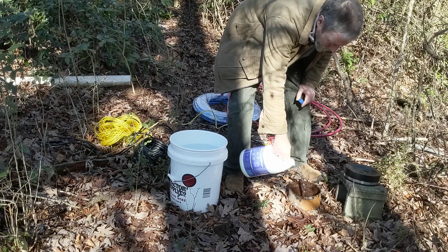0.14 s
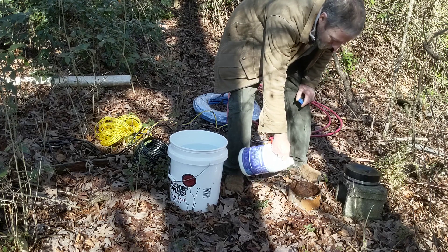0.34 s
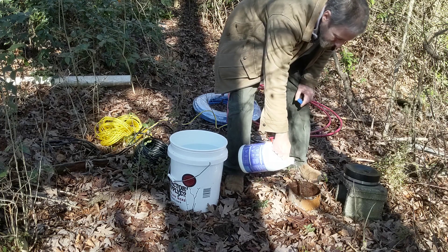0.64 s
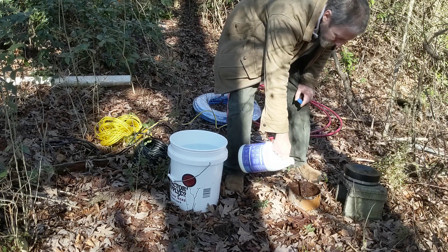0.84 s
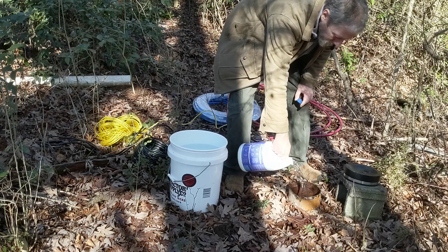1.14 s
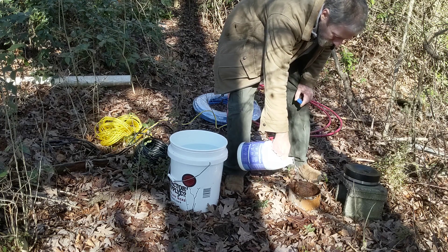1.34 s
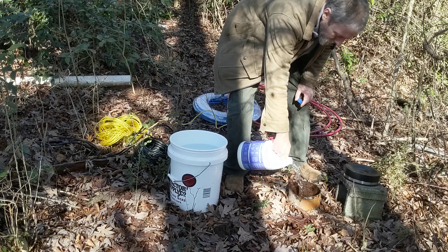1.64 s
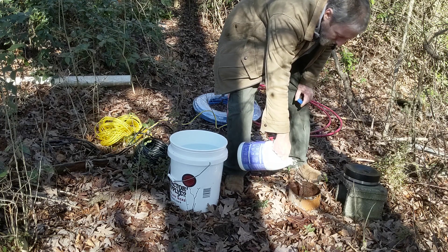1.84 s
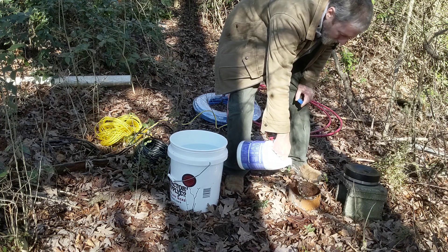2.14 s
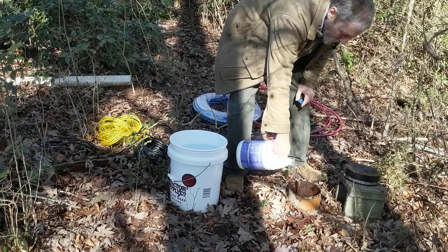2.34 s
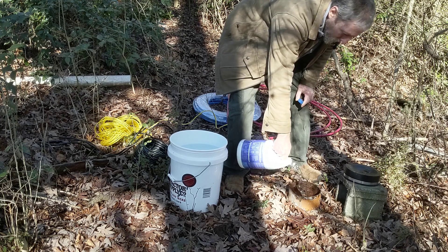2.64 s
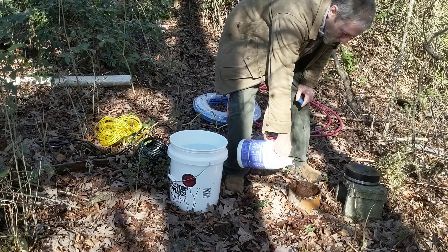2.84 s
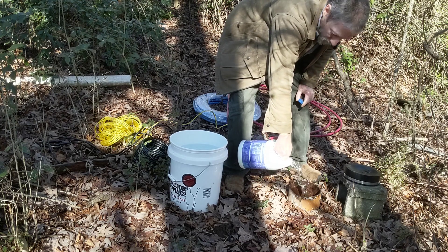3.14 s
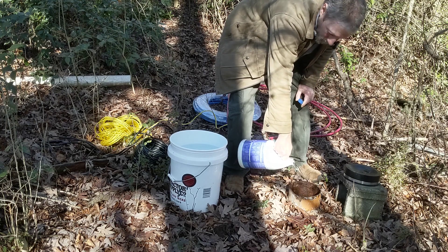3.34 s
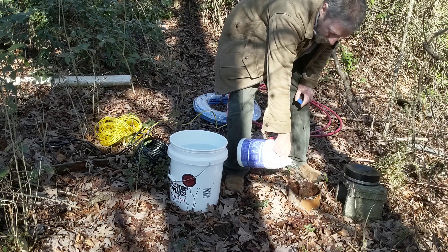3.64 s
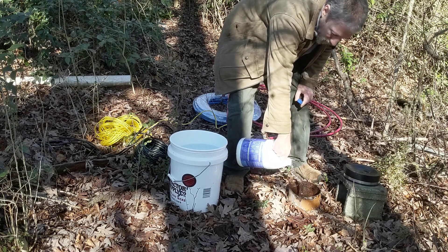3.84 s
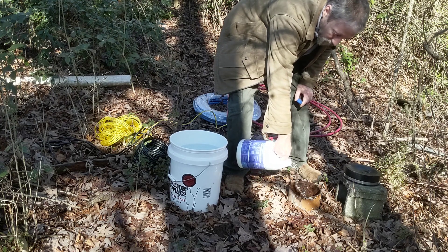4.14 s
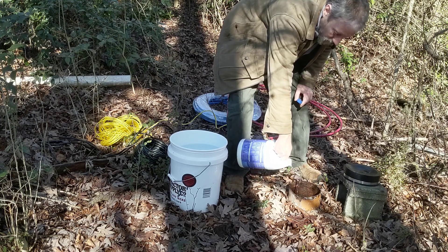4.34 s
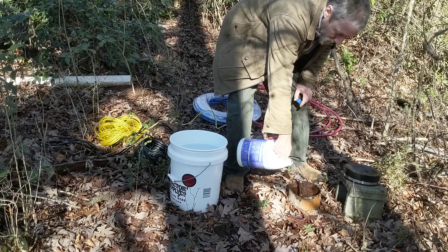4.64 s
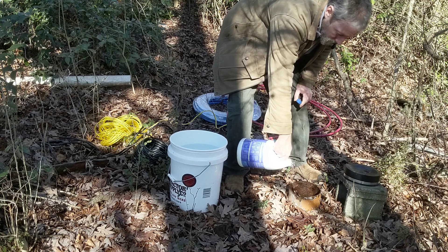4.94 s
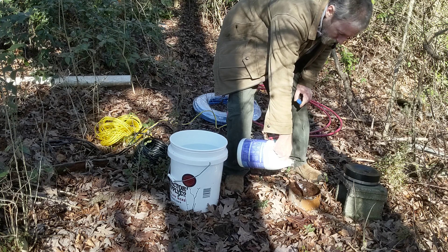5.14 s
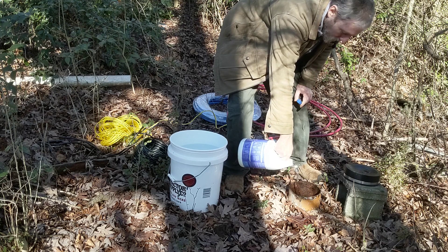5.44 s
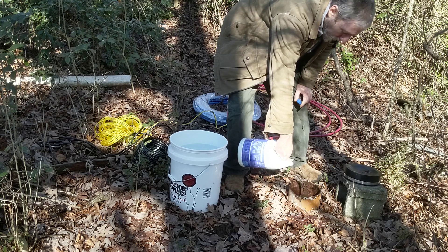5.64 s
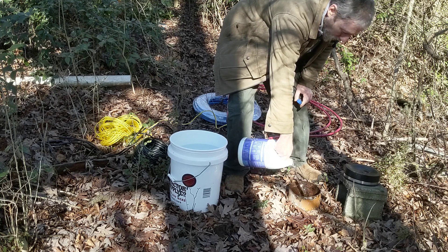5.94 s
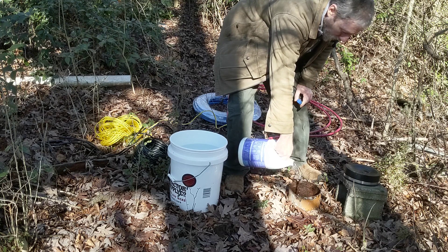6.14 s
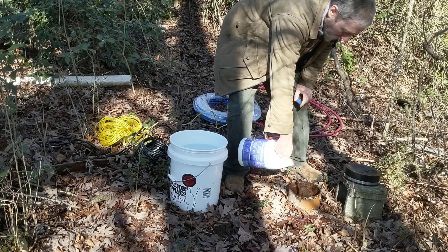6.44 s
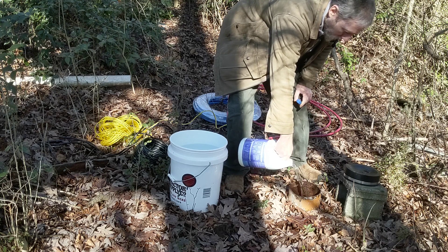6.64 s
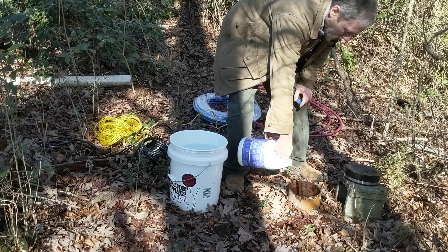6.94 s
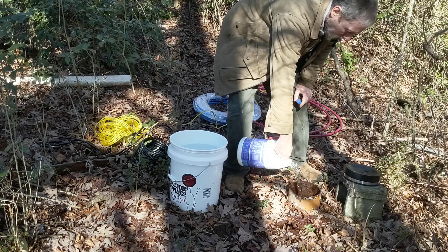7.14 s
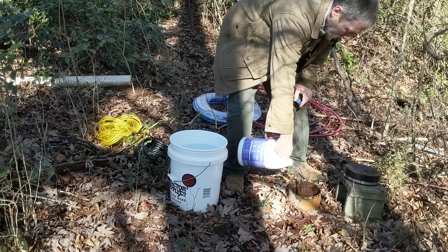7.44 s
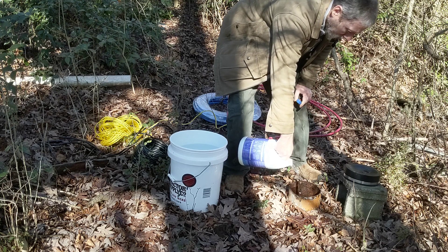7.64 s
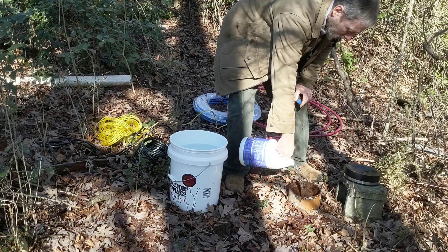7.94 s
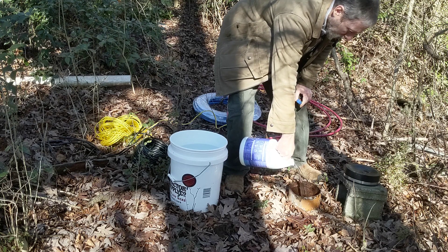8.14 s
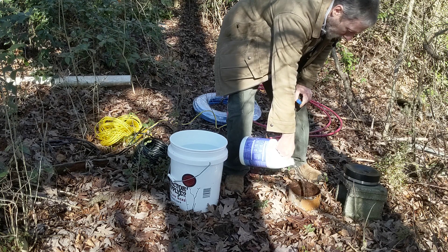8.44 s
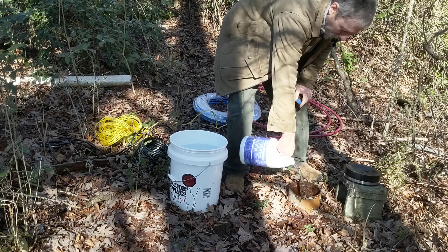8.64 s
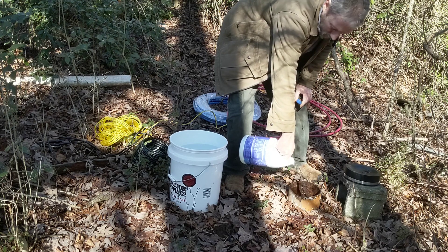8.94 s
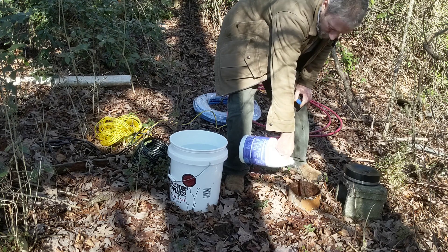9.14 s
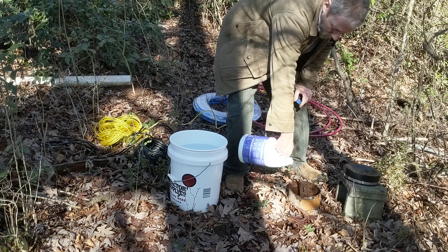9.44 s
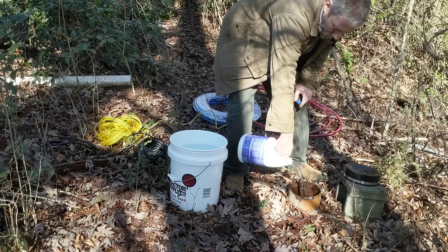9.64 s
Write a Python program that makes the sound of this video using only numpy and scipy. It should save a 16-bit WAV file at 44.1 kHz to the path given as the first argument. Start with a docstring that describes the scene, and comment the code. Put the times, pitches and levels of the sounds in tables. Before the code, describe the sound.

A stream already falling into a deep pipe splashes in separate irregular slugs, then thickens into busy gurgling with pitch-rising air gulps, ringing plops and crisp droplets. The tube gives everything a hollow, metallic-tinged short echo. Later the flow grows patchy and weak, almost halts, then spurts again. Heard centrally from several steps away in quiet open air, with soft low rumble and barely audible hiss.

```python
"""Bleach poured down a narrow well casing, outdoors, a few steps away, over a low rumble and a faint hiss.
Slugs slap the water about two metres down from the start; ringing bubbles and smacks join at once.
Gulps sweep up in pitch between 1.0 and 2.3 s; dense slugs follow, thinning after 6.5 s.
The pour nearly stalls after 8.8 s and spurts again at 9.2 s. Noise and bubble swarms make the splash,
decaying sines the bubbles; echoes between the water and the open mouth make the gurgle hollow."""
import sys
import numpy as np
from scipy import signal
from scipy.fft import rfft, irfft, next_fast_len
from scipy.io import wavfile
from scipy.ndimage import uniform_filter1d, map_coordinates

SR = 44100
rng = np.random.default_rng(int(sys.argv[2]) if len(sys.argv) > 2 else 0)


def wav_record(signal):
    """Record a signal, one row per channel, as 16-bit PCM in the file named by sys.argv[1]."""
    frames = np.transpose(np.atleast_2d(signal))
    bounded = np.clip(frames, -1, 1)
    # unit amplitude maps onto the largest positive 16-bit level
    quanta = np.round(bounded * 32767).astype(np.int16)
    wavfile.write(sys.argv[1], SR, quanta)


N = 430857

# All table levels are relative: layer trims and the casing follow.
# Low rumble of the pour, swelling with heavy thumps, sinking when the pour stalls: time_s, level_db
RUMBLE_LEVEL = [(0.0, -50.5), (4.2, -51.5), (4.65, -44.5), (5.2, -52), (5.7, -46), (6.4, -50.5),
                (8.68, -48.5), (9.2, -61), (9.3, -54), (9.77, -48.5)]
# Rumble spectrum: freq_hz, density_db_per_hz
RUMBLE_SPECTRUM = [(22, -48), (48, -3.5), (62, 1.5), (90, -8), (115, -4), (170, -12.5), (400, -19.5)]
# Outdoor hiss spectrum: freq_hz, density_db_per_hz
HISS_SPECTRUM = [(100, -23.5), (1500, -5.5), (4000, 9), (15000, -20.5)]

# Casing, surviving share per round trip: freq_hz, share
RETURN_SHARE = [(100, 0.69), (340, 0.77), (600, 0.59), (860, 0.61), (1200, 0.38), (1600, 0.11)]
ROUND_TRIP_S = 0.01325
# Cross resonances of the bore: cut_on_hz (lowest that travels), level_db
CROSS_MODES = [(1140, -9), (1900, -7), (2380, -11.5), (3300, -16.5)]
CROSS_DAMPING_HZ = 9.5
CROSS_SPLASH_DB = -2.5  # drive by the splash, against the big bubbles

# Thin, uneven stream between slugs: time_s, gurgle_db, patter_db, spray_db
STREAM_LEVELS = [(0, -49.5, -44, -43), (0.7, -58, -64, -46.5), (1.1, -65, -33, -57.5),
                 (1.6, -47, -37.5, -44), (2.3, -51, -32.5, -49.5), (2.9, -57, -35, -56),
                 (3.3, -38.5, -44, -54), (3.88, -60, -52, -60.5), (4.5, -39, -50, -55.5),
                 (4.92, -66, -49, -61), (5.45, -62, -51, -62), (5.85, -39, -58, -59),
                 (6.65, -56.5, -53, -59.5), (7.45, -67, -50, -58.5), (8.2, -50, -54, -60),
                 (8.85, -64, -53.5, -65), (9.15, -72, -68, -74.5), (9.45, -52, -52, -58.5),
                 (9.77, -51, -58, -65)]
STREAM_TRIMS_DB = [[-3.5], [-1], [-0.5]]  # gurgle, patter, spray
STREAM_MIST_DB = -9.5  # against the trimmed spray
# Slugs hitting the water: start_s, gurgle_db, patter_db, spray_db, mist_db, rise_s, decay_s
# (decay_s is scaled per layer)
SLUG_HITS = [(0.0, -58, -24.5, -31.5, -38.5, 0.0012, 0.092), (0.053, -50.5, -49, -54, -61.5, 0.0012, 0.54),
             (0.17, -43, -19.5, -31.5, -39.5, 0.0011, 0.064), (0.252, -47, -33, -38, -48.5, 0.0021, 0.016),
             (0.339, -59.0, -41, -30, -40.5, 0.0014, 0.048), (0.385, -48, -31.5, -40, -44, 0.0018, 0.019),
             (0.51, -51, -43, -41.5, -49, 0.0014, 0.06), (0.65, -55, -41, -29, -40.5, 0.02, 0.057),
             (0.803, -55.5, -37, -34, -42, 0.016, 0.21), (0.956, -53, -26, -31, -37.5, 0.0028, 0.18),
             (1.059, -46, -27, -49, -43, 0.0018, 0.14), (1.139, -31.5, -29.5, -31.5, -40.5, 0.0049, 0.13),
             (1.214, -25, -26, -20, -35, 0.0027, 0.013), (1.335, -33, -28.5, -50.5, -47.5, 0.0014, 0.11),
             (1.413, -34, -20, -24.5, -34.5, 0.0044, 0.035), (1.623, -35, -19, -30, -32, 0.0059, 0.035),
             (1.687, -40, -25.5, -39, -50, 0.0023, 0.092), (1.756, -30.5, -18, -22.5, -33, 0.00087, 0.023),
             (1.793, -32.5, -24, -38, -44.5, 0.031, 0.19), (1.842, -30, -26, -57, -56, 0.0017, 0.023),
             (1.913, -45, -15, -24.5, -39.5, 0.0025, 0.026),
             (1.983, -30.5, -20.5, -26, -37.5, 0.0011, 0.057), (2.094, -26, -17.5, -30, -38, 0.014, 0.091),
             (2.179, -32, -21, -29.5, -42, 0.011, 0.04), (2.227, -35, -26, -35, -40.5, 0.001, 0.089),
             (2.394, -39, -35, -54, -50.5, 0.0016, 0.095), (2.467, -37.5, -20, -33.5, -39.5, 0.0013, 0.078),
             (2.544, -64, -29, -58, -66.0, 0.0013, 0.042), (2.593, -30, -14.5, -30.5, -39.5, 0.014, 0.048),
             (2.668, -39.5, -19, -32.5, -39.5, 0.0066, 0.085), (2.807, -47.5, -31, -37, -61.5, 0.066, 0.17),
             (2.879, -34, -31, -49, -70, 0.0012, 0.1), (2.937, -43, -20.5, -32, -42.5, 0.0012, 0.094),
             (3.085, -34, -16.5, -30.5, -45, 0.028, 0.069), (3.186, -31.5, -22, -34.5, -46, 0.011, 0.091),
             (3.359, -25, -11, -21.5, -38.5, 0.037, 0.049), (3.444, -29, -18, -30, -40.5, 0.0023, 0.027),
             (3.61, -33, -33.5, -48, -61, 0.0067, 0.091), (3.718, -26.5, -19, -35, -46, 0.014, 0.036),
             (3.958, -38.5, -25, -39, -51, 0.0031, 0.11), (4.177, -39, -53.5, -56.5, -69, 0.004, 0.12),
             (4.232, -27, -27, -30, -35, 0.025, 0.059), (4.376, -32, -19, -32, -42, 0.001, 0.051),
             (4.474, -26.5, -17, -20.5, -30.5, 0.041, 0.041),
             (4.59, -29.5, -21.5, -33.5, -43.5, 0.0079, 0.086),
             (4.707, -25, -19.5, -33.5, -39, 0.002, 0.044), (4.775, -43.5, -41, -69, -65, 0.0026, 0.093),
             (4.838, -46, -31, -52, -52.5, 0.0093, 0.052), (4.957, -39.5, -28, -54, -44.5, 0.0061, 0.095),
             (4.974, -47, -47, -39, -37.5, 0.015, 0.082), (5.107, -30, -26.5, -34.5, -39.5, 0.0015, 0.059),
             (5.159, -31, -29, -28.5, -54.5, 0.00087, 0.02), (5.222, -36.5, -33, -50.5, -52, 0.017, 0.068),
             (5.278, -26, -15, -28, -36.5, 0.029, 0.038), (5.412, -59, -48, -51.5, -58.5, 0.00092, 0.1),
             (5.507, -34.5, -23, -37.5, -52, 0.016, 0.08), (5.599, -24.5, -18, -26.5, -37.5, 0.014, 0.061),
             (5.689, -24.5, -25, -44.5, -45, 0.0011, 0.031), (5.783, -53, -32, -34, -66, 0.001, 0.058),
             (5.877, -59, -20.5, -37.5, -54, 0.0011, 0.044), (5.944, -35, -41, -46, -54, 0.0023, 0.17),
             (6.044, -41.5, -23, -23, -65, 0.0011, 0.026),
             (6.131, -31.5, -17.5, -29.5, -41.5, 0.0012, 0.028), (6.187, -46, -44, -44, -57, 0.0011, 0.18),
             (6.278, -31.5, -28, -31, -45, 0.011, 0.058), (6.395, -27.5, -20.5, -27, -38.5, 0.014, 0.043),
             (6.447, -17.5, -36, -25, -36, 0.033, 0.028), (6.796, -32, -27, -32, -39.5, 0.003, 0.067),
             (6.865, -38, -36.5, -72, -81, 0.001, 0.095), (7.033, -38, -30, -43, -53.5, 0.0014, 0.082),
             (7.13, -35, -17, -30.5, -43, 0.0068, 0.034), (7.185, -38, -37, -46.5, -48.5, 0.0011, 0.032),
             (7.242, -44, -63, -54, -63, 0.0015, 0.16), (7.532, -42, -30, -34.5, -47.5, 0.0016, 0.071),
             (7.655, -42.5, -38.5, -46.5, -61, 0.0011, 0.079), (7.768, -40, -39, -48.5, -55, 0.00098, 0.1),
             (7.861, -35, -33, -49, -58, 0.022, 0.065), (7.972, -40.5, -28.5, -26.5, -29.5, 0.0043, 0.033),
             (7.989, -62, -43, -45, -55, 0.0014, 0.18), (8.087, -44.5, -33, -47, -48.5, 0.0084, 0.13),
             (8.239, -33.5, -46, -36.5, -41.5, 0.022, 0.053), (8.34, -47, -39, -41, -53, 0.0044, 0.075),
             (8.396, -26, -31, -45, -51, 0.0058, 0.023), (8.484, -42, -39, -56, -59, 0.001, 0.072),
             (8.586, -30.5, -31, -33, -46.5, 0.0028, 0.032), (8.741, -42, -40.5, -40.5, -49, 0.014, 0.049),
             (9.233, -48, -34.5, -37, -56, 0.0041, 0.11), (9.266, -31, -21.5, -36, -52, 0.005, 0.04),
             (9.381, -48, -42, -42, -54, 0.0012, 0.072), (9.577, -54, -49, -65, -71, 0.002, 0.37),
             (9.695, -31.5, -27, -48, -51, 0.016, 0.036)]
SLAP_S, SLAP_DB = 0.0032, 3  # decay; level over the splash
GURGLE_LAG_S = 0.0014  # added to the rise of the gurgle
SPLASH_DECAY_SCALE, SPRAY_DECAY_SCALE = 0.85, 0.67  # times decay_s
# Churned water spectrum: freq_hz, density_db_per_hz
CHURN_SPECTRUM = [(105, 1), (190, 7.5), (270, -4.5), (420, 3), (600, 0)]
# Large bubble spectrum: freq_hz, density_db_per_hz
GURGLE_SPECTRUM = [(200, -6), (340, -31), (540, -20.5), (800, -3.5), (1020, -3.5), (1250, 3.5), (1420, -3),
                   (1700, 3.5)]
# Small bubble spectrum: freq_hz, density_db_per_hz
PATTER_SPECTRUM = [(1150, -51.5), (1450, -3), (2000, 5.5), (2650, -1), (3300, 1.5), (3800, -1.5),
                   (4200, -25), (5000, -36.5)]
# Droplet spectrum: freq_hz, density_db_per_hz
SPRAY_SPECTRUM = [(3700, 4), (4300, -3.5), (5000, 2), (5800, -1.5), (6900, -14.5), (8200, -20.5)]
# Finest spray spectrum: freq_hz, density_db_per_hz
MIST_SPECTRUM = [(6300, 2), (7000, -1), (7600, 2.5), (9200, 1.5), (11000, -4), (13300, -8.5), (15800, -31)]

# Surface heave spectrum: freq_hz, density_db_per_hz
HEAVE_SPECTRUM = [(55, 5), (110, -2), (190, -3), (290, -17.5), (450, -2)]
HEAVE_DB, HEAVE_DB_PER_GURGLE_DB, HEAVE_PEAK_S = -54.5, 0.28, 0.038

# Rising air pockets: start_s, start_hz, end_hz, length_s, level_db
GULP_EVENTS = [(1.066, 284, 343, 0.05, -29.5), (1.136, 354, 710, 0.072, -36.5),
               (1.191, 643, 992, 0.078, -42), (1.258, 317, 361, 0.048, -33.5), (1.475, 411, 710, 0.02, -36),
               (1.492, 670, 1150, 0.016, -26.5), (1.79, 738, 775, .06, -30.5),
               (2.169, 383.5, 410, 0.049, -35), (2.198, 673, 856, 0.035, -26.5)]
# Gulp froth spectrum: freq_hz, density_db_per_hz
FROTH_SPECTRUM = [(170, -4), (400, -1), (510, -14), (800, 4.5), (1400, -5)]
FROTH_DB = -10.5  # against the gulp's table level
GULP_ATTACK_SHARE, GULP_RING_SHARE = 0.025, 1.1  # of length_s
GULP_ROUGH_DEPTH, GULP_KNOTS_PER_CYCLE = 0.6, 0.65

# Collapsing air pockets that barely ring: start_s, pitch_hz, level_db
SMACK_EVENTS = [(0.059, 1770, -10.5), (0.103, 4630, -21.5), (0.313, 3520, -20.5), (0.34, 3000, -18.5),
                (0.609, 4570, -28.5), (0.96, 3370, -15), (1.082, 2420, -7.5), (1.226, 1470, -9),
                (1.341, 874, -2.5), (1.441, 1900, -12), (1.69, 2180, -12.5), (1.758, 3320, -10.5),
                (2.103, 1410, -6.5), (2.137, 1740, -6.5), (2.362, 3420, -20), (2.398, 3140, -7),
                (2.475, 3070, -12), (2.515, 1910, -11), (2.596, 3780, -16.5), (2.687, 2680, -26),
                (2.758, 3720, -16.5), (2.892, 3590, -8.5), (2.976, 3760, -16), (3.155, 1690, -15.5),
                (3.216, 1850, -16), (3.415, 3450, -10.5), (3.447, 1450, -7), (3.657, 2200, -14.5),
                (3.729, 2370, -18), (4.237, 1800, -13.5), (4.29, 1790, -20), (4.377, 1670, -12.5),
                (4.532, 2010, -7.5), (4.715, 1480, -11), (5.173, 1840, -14.5), (5.317, 555, -17),
                (5.321, 1110, -16), (5.546, 2750, -8.5), (5.576, 1330, -10.5), (5.646, 2390, -11),
                (5.85, 3000, -15), (5.884, 3260, -18.5), (6.057, 1300, -9.5), (6.134, 1360, -6.5),
                (6.19, 3160, -17.5), (6.876, 930, -14.5), (7.053, 1380, -13.5), (7.071, 3060, -19),
                (7.134, 1990, -21), (7.15, 2140, -16), (7.546, 1930, -14.5), (7.797, 1410, -20.5),
                (8.34, 3250, -17.5), (8.59, 5560, -22), (9.287, 2220, -14), (9.395, 2050, -19.5),
                (9.416, 3760, -23), (9.462, 3760, -20.5)]
SMACK_SWELL_CYCLES, SMACK_DECAY_S = 0.86, 0.0015

# Ringing bubbles, loud and quiet: start_s, pitch_hz, level_db
BUBBLE_EVENTS = [(0.041, 1796, -16.5), (0.053, 1180, -29.5), (0.129, 1105, -28), (0.156, 730, -29),
                 (0.206, 3030, -21), (0.26, 1916, -16), (0.384, 1410, -32), (0.392, 2700, -24),
                 (0.436, 1530, -36), (0.534, 1230, -35.5), (0.678, 1950, -26), (1.0, 1170, -29),
                 (1.059, 2025, -17.5), (1.16, 1904, -15), (1.225, 1820, -17.5), (1.258, 900, -36),
                 (1.647, 187, -45.5), (1.735, 1810, -22), (1.755, 3270, -17), (2.086, 1820, -19),
                 (1.85, 1180, -25), (1.839, 310, -44), (2.011, 2180, -17), (2.135, 1860, -14.5),
                 (2.159, 191, -35), (2.132, 670, -32), (2.548, 1623, -16), (2.583, 1160, -24),
                 (2.907, 1350, -24), (3.103, 1120, -22.5), (3.113, 884, -25), (3.208, 872, -25.5),
                 (3.45, 286, -38.5), (3.464, 1346, -21), (3.663, 2150, -21.5), (3.742, 1630, -26),
                 (3.986, 1460, -23), (4.193, 1310, -30), (4.25, 1645, -23.5), (4.427, 2500, -27),
                 (4.478, 733, -26), (4.502, 1875, -16), (4.531, 3090, -20), (4.71, 784, -28.5),
                 (4.754, 1910, -23), (4.776, 1520, -28), (4.791, 1800, -21), (4.803, 814, -39.5),
                 (4.886, 757, -42), (4.958, 2050, -19), (4.991, 1177, -25), (5.044, 1536, -25.5),
                 (5.114, 1720, -17), (5.168, 372, -40), (5.329, 1114, -40), (5.542, 2010, -26),
                 (5.555, 888, -24.5), (5.564, 320, -34.5), (5.631, 855, -27), (5.69, 1870, -29),
                 (5.746, 720, -31.5), (5.894, 3440, -17), (5.948, 1920, -22), (5.988, 1890, -22.5),
                 (5.849, 1530, -21), (5.885, 3180, -17.5), (6.044, 3160, -16), (6.054, 860, -28.5),
                 (6.15, 261.4, -33), (6.296, 1120, -23), (6.461, 1150, -19), (6.488, 1094, -25),
                 (6.624, 733, -41.5), (6.818, 1460, -22), (6.857, 1520, -21), (6.874, 741, -26),
                 (6.959, 890, -34), (7.041, 455, -42.5), (7.149, 1903, -21), (7.186, 1600, -27),
                 (7.249, 1126, -33), (7.275, 910, -31), (7.321, 1160, -34.5), (7.38, 905, -32.5),
                 (7.398, 1020, -32), (7.593, 220.6, -41), (7.78, 720, -43), (7.865, 1247, -25),
                 (7.87, 1005, -26), (7.994, 3380, -20), (8.165, 867, -31.5), (8.083, 2000, -32.5),
                 (8.177, 1180, -34), (8.27, 650, -35), (8.34, 710, -37), (8.37, 283, -42),
                 (8.13, 1870, -34), (8.4, 1354, -26), (8.665, 1368, -27.5), (9.243, 124.6, -36.5),
                 (9.285, 1974, -14.5), (9.266, 1325, -36), (9.317, 1150, -23), (9.506, 1630, -38),
                 (9.586, 1385, -36), (9.708, 1810, -31)]
LIFE_CYCLES_1KHZ, LIFE_SLOPE = 3.78, 0.68  # cycles to peak at 1 kHz; larger bubbles live longer
GLIDE_1KHZ, GLIDE_SLOPE, MAX_GLIDE = 0.03, 0.42, 0.065  # share of pitch gained in one life
SHED_COUNT, SHED_DB, SHED_WITHIN_S, SHED_OCTAVES = 4, -11.5, 0.042, 0.17
WAVER_CYCLES, WAVER_KNOTS_PER_S = 0.13, 170
ROUND_ABOVE_HZ = 2200  # waver shrinks above this pitch

TOP_HZ = 15830


def amp(db):
    """Decibels to gain."""
    return 10 ** (np.asarray(db) / 20)


def unit(x):
    """Scale to rms 1."""
    return x / np.sqrt(np.mean(x ** 2) + 1e-20)


def along(points, hz):
    """Read (freq_hz, value) points on a log frequency axis."""
    f, v = np.transpose(points)
    return np.interp(np.log(hz + 1), np.log(f), v)


def curves(rows):
    """One sample-rate curve per column after the time."""
    s, *cols = np.transpose(rows)
    return np.array([np.interp(np.arange(N) / SR, s, c) for c in cols])


def filtered(x, response):
    """Apply a complex frequency response."""
    size = next_fast_len(N + SR // 2)
    return irfft(rfft(x, size) * response(np.fft.rfftfreq(size, 1 / SR)), size)[..., :N]


def coloured(x, spectrum):
    """Shape x by a spectrum, falling away beyond its ends, at rms 1."""
    low_hz, high_hz = spectrum[0][0], spectrum[-1][0]

    def response(hz):
        skirts = np.minimum(hz / low_hz, 1) ** 2 * np.minimum(high_hz / (hz + 1), 1) ** 2
        return amp(along(spectrum, hz)) * skirts
    return unit(filtered(x, response))


def noise(spectrum):
    """Coloured Gaussian noise at rms 1."""
    return coloured(rng.standard_normal(N), spectrum)


def add(track, start_s, sound):
    """Mix a sound into a track."""
    start = max(round(start_s * SR), 0)
    room = track[..., start:start + sound.shape[-1]]
    room += sound[..., :room.shape[-1]]


def smooth(knots, position):
    """Read random knots as a smooth cyclic curve."""
    return map_coordinates(knots, [position], order=2, mode="wrap")


def wobble(knots_per_s):
    """Smooth random curve."""
    return smooth(rng.standard_normal(2000), np.arange(N) * knots_per_s / SR)


def hissing():
    """Very faint outdoor hiss: steady filtered noise."""
    return amp(-72.0) * noise(HISS_SPECTRUM)


def rumbling():
    """Low rumble of the pour: filtered noise, swelling with heavy thumps, sinking when the pour stalls."""
    return amp(curves(RUMBLE_LEVEL)[0] - 0.44) * noise(RUMBLE_SPECTRUM)


def casing(x):
    """The open mouth returns sound inverted: the air column rings at odd multiples of its lowest note."""
    def response(hz):
        share = np.clip(along(RETURN_SHARE, hz), 0, 0.9)
        return 1 / (1 + share * np.exp(-2j * np.pi * hz * ROUND_TRIP_S))
    return filtered(x, response)


def late_smear(x, cut_on_hz, t60_s):
    """Diffuse late smear of the casing above a given pitch, through two drifting random tails."""
    t = np.arange(SR // 6) / SR
    tails = rng.standard_normal((2, len(t))) * amp(-60 * t / t60_s) * (1 - np.exp(-t / 0.011))
    tails /= np.linalg.norm(tails[0])
    turn = 2 * wobble(10)
    # the input drifts between the tails
    smeared = signal.oaconvolve(x * np.array([np.cos(turn), np.sin(turn)]), tails, axes=1)
    return filtered(smeared.sum(axis=0)[:N], lambda hz: 1 - 1 / (1 + (hz / cut_on_hz) ** 8))


def crosswise(x):
    """Each cross resonance is dispersive: a quick falling chirp settles on its pitch; strength varies."""
    def travel(hz, cut_on_hz):
        damped = hz - 1j * CROSS_DAMPING_HZ
        axial = -1j * np.sqrt(cut_on_hz ** 2 - damped ** 2)
        return np.sqrt(damped / axial) * np.exp(-1j * np.pi * ROUND_TRIP_S * (axial - hz))

    total = np.zeros(N)
    for cut_on_hz, db in CROSS_MODES:
        drive = x * np.sqrt(2) * np.sin(2 * wobble(25))  # depends on where the drop lands
        total += amp(db) * filtered(drive, lambda hz: travel(hz, cut_on_hz))
    return total


def heaving():
    """Each slug heaves the water column: a soft low thump, nearly as strong for a weak slug."""
    power = np.zeros(N)
    age = np.arange(SR // 2) / SR / HEAVE_PEAK_S
    for s, gurgle_db, *_ in SLUG_HITS:
        gain = amp(HEAVE_DB + HEAVE_DB_PER_GURGLE_DB * gurgle_db)
        add(power, s, (gain * age * np.exp(1 - age)) ** 2)
    return np.sqrt(power) * noise(HEAVE_SPECTRUM)


def bubble(t, hz, life_s, glide):
    """A trapped bubble swells, rings and dies; its pitch climbs as it nears the surface."""
    age = t / life_s
    return age * np.exp(1 - age) * np.sin(2 * np.pi * hz * t * (1 + glide * age / 2))


def swarm(spectrum, low_hz, high_hz, cycles, spread_db, wash, smear, count, size):
    """Many random small bubbles, merged by the casing, on a wash of noise, at rms 1."""
    when, pitch, length, strength = rng.random((count, 4)).T[..., None]
    hz = low_hz + (high_hz - low_hz) * pitch
    life_s = cycles * 2 ** (2 * length - 1) / hz
    gain = amp(-spread_db * np.log(np.maximum(strength, 0.02))) / np.sqrt(life_s)
    rings = gain * bubble(np.arange(size) / SR, hz, life_s, glide=0.01)
    places = (when * N).astype(int) + np.arange(size)
    grains = np.bincount(places.ravel(), rings.ravel(), N)[:N]
    merged = grains + smear * late_smear(grains, cut_on_hz=1290, t60_s=0.16)
    return unit(coloured(merged, spectrum) + wash * noise(spectrum))


def droplets(count, spread_db):
    """Single drops tick on the casing wall: short noise bursts, at rms 1."""
    when, strength = rng.random((2, count))
    gain = amp(-spread_db * np.log(np.maximum(strength, 0.05)))
    hits = np.bincount((when * N).astype(int), gain, N)
    t = np.arange(SR // 100) / SR
    tick = rng.standard_normal(len(t)) * amp(-60 * t / 0.011)
    ticks = signal.fftconvolve(hits, tick)[:N]
    return unit(coloured(ticks, SPRAY_SPECTRUM) + amp(-10) * coloured(ticks, PATTER_SPECTRUM))


def patchy(x, depth_db):
    """The stream wanders across the bore: random time-frequency patches favour other resonances."""
    z = signal.stft(x, nperseg=512)[2]
    field = uniform_filter1d(rng.standard_normal(z.shape), size=5, axis=0)
    field = uniform_filter1d(field, size=7, axis=1)
    return unit(signal.istft(z * amp(depth_db * unit(field)), nperseg=512)[1][:N])


def slug_power():
    """Power of gurgle, patter, spray, mist: each slug slaps, splashes, dies; its gurgle lags."""
    power = np.zeros((4, N))
    t = np.arange(SR // 3) / SR

    def fade(decay_s):
        return np.exp(-(t / decay_s) ** 1.266)

    for s, gurgle_db, patter_db, spray_db, mist_db, rise_s, decay_s in SLUG_HITS:
        swell = 1 - np.exp(-t / rise_s)
        gurgle = (1 - np.exp(-t / (rise_s + GURGLE_LAG_S))) * fade(decay_s)
        slap = amp(SLAP_DB) * np.exp(-t / SLAP_S)
        splash = swell * (fade(SPLASH_DECAY_SCALE * decay_s) + slap)
        hiss = swell * fade(SPRAY_DECAY_SCALE * decay_s)
        layers = [amp(gurgle_db) * gurgle, amp(patter_db) * splash,
                  amp(spray_db) * hiss, amp(mist_db) * hiss]
        add(power, s, np.array(layers) ** 2)
    return power


def splashing():
    """Slugs churn the water and throw up bubbles, spray and mist over the thin, uneven stream."""
    gurgle_db, patter_db, spray_db = curves(STREAM_LEVELS) + STREAM_TRIMS_DB
    stream_db = [gurgle_db, patter_db, spray_db, spray_db + STREAM_MIST_DB]
    power = amp(stream_db) ** 2 + slug_power()
    flutter = amp(1.6 * wobble(70))  # of the falling stream
    gurgle, patter, spray, mist = np.sqrt(power) * flutter
    bursts = amp(2.43 * wobble(190))  # droplets land in clusters

    large = swarm(GURGLE_SPECTRUM, 241.3, 1515.0, cycles=2.75, spread_db=5.0,
                  wash=0.38, smear=1.0, count=2400, size=1400)
    small = swarm(PATTER_SPECTRUM, 1265, 4510, cycles=2.4, spread_db=3.6,
                  wash=0.25, smear=0.45, count=7000, size=500)
    churning = amp(-20) * gurgle * noise(CHURN_SPECTRUM)
    gurgling = amp(-0.5) * gurgle * large
    pattering = amp(-4.0) * patter * patchy(small, depth_db=2.8)
    spraying = amp(1.0) * spray * bursts * patchy(noise(SPRAY_SPECTRUM), depth_db=3.5)
    misting = amp(0.68) * mist * bursts ** 0.88 * patchy(noise(MIST_SPECTRUM), depth_db=3.5)
    ticking = amp(-3.5) * spray * droplets(count=450, spread_db=3.5)
    return churning + gurgling + pattering + spraying + misting + ticking


def gulps():
    """Large air pockets sweep up in pitch ever faster, wobble, and froth the water around them."""
    rings, froth = np.zeros((2, N))
    for s, start_hz, end_hz, length_s, db in GULP_EVENTS:
        age = np.arange(int(GULP_RING_SHARE * length_s * SR)) / (length_s * SR)
        hz = start_hz + (end_hz - start_hz) * age ** 2
        level = (1 - np.exp(-age / GULP_ATTACK_SHARE)) / (1 + age ** 10)
        cycles = np.cumsum(hz) / SR
        swell, sway = [GULP_ROUGH_DEPTH * smooth(knots, cycles * GULP_KNOTS_PER_CYCLE)
                       for knots in rng.standard_normal((2, 200))]
        phase = 2 * np.pi * cycles
        ring = (1 + swell) * np.sin(phase) + sway * np.cos(phase)
        add(rings, s, amp(db - 0.5) * level * ring)
        add(froth, s, amp(db + FROTH_DB) * level)
    return rings + froth * noise(FROTH_SPECTRUM)


def smacks():
    """Air pockets collapse within a few cycles and ring down briefly, with a wet tick."""
    rings, ticks = np.zeros((2, N))
    t = np.arange(SR // 30) / SR
    for s, hz, db in SMACK_EVENTS:
        swell = 1 - np.exp(-(t * hz / SMACK_SWELL_CYCLES) ** 2)
        shape = swell * np.exp(-t / SMACK_DECAY_S)
        add(rings, s, amp(db + 2.5) * shape * np.sin(2 * np.pi * hz * t))
        add(ticks, s, amp(db - 60 * t / 0.013))
    return rings + amp(-26.5) * ticks * noise(SPRAY_SPECTRUM)


def trapped_air():
    """Rows start_s, pitch_hz, level_db, life_s: bubbles and the weaker ones they shed; size sets life."""
    air = list(BUBBLE_EVENTS)
    chance = rng.random((len(BUBBLE_EVENTS), SHED_COUNT, 2))
    for (s, hz, db), pieces in zip(BUBBLE_EVENTS, chance):
        for late, size in pieces:
            shed_hz = hz * 2 ** (SHED_OCTAVES * (2 * size - 1))
            air.append((s + SHED_WITHIN_S * late, shed_hz, db + SHED_DB))
    return [(s, hz, db, LIFE_CYCLES_1KHZ / 1000 * (1000 / hz) ** LIFE_SLOPE) for s, hz, db in air]


def climb(hz):
    """Share by which pitch rises in one life: more for a large bubble."""
    return min(GLIDE_1KHZ * (1000 / hz) ** GLIDE_SLOPE, MAX_GLIDE)


def wavering(t, waver, start_s, hz):
    """Uneven clock of a bubble out of round; small bubbles stay rounder and ring more cleanly."""
    drift = np.take(waver, int(start_s * SR) + np.arange(len(t)), mode="wrap")
    swing_cycles = WAVER_CYCLES * min(ROUND_ABOVE_HZ / hz, 1) ** 2
    return np.abs(t + swing_cycles * (drift - drift[0]) / hz)


def plops():
    """Bubbles ring, pinch off with a wet tick and shove water aside, the more so the larger."""
    rings, ticks, shoves = np.zeros((3, N))
    t = np.arange(SR // 6) / SR
    waver = wobble(WAVER_KNOTS_PER_S)
    for s, hz, db, life_s in trapped_air():
        clock = wavering(t, waver, s, hz)
        add(rings, s, amp(db) * bubble(clock, hz, life_s, climb(hz)))
        add(ticks, s, amp(db - 60 * t / 0.011))
        add(shoves, s, amp(db - 60 * t / 0.061) * min(300 / hz, 1) ** 2 * np.tanh(t / life_s))
    tick = amp(-41.0) * ticks * noise(SPRAY_SPECTRUM)
    shove = amp(-14.0) * shoves * noise(CHURN_SPECTRUM)
    return rings + tick + shove


def scene():
    """The well sounds from its mouth, straight ahead, with rumble and hiss: two equal channels."""
    big = plops() + smacks() + gulps()
    splash = splashing()
    late = amp(-7.5) * late_smear(big, cut_on_hz=320, t60_s=0.089)
    late += crosswise(big + amp(CROSS_SPLASH_DB) * splash)
    well = casing(splash + heaving() + big + late)
    return np.tile(well + rumbling() + hissing(), (2, 1))


def record(dry):
    """Cut everything from the band limit up."""
    return filtered(dry, lambda hz: hz < TOP_HZ)


dry = scene()
out = record(dry)
wav_record(out)
```